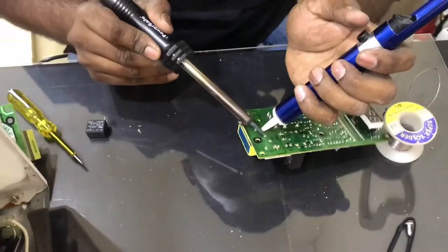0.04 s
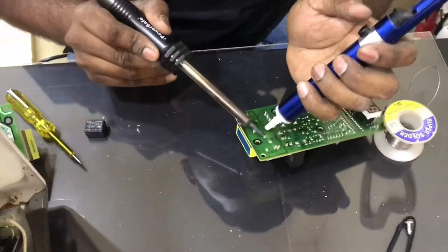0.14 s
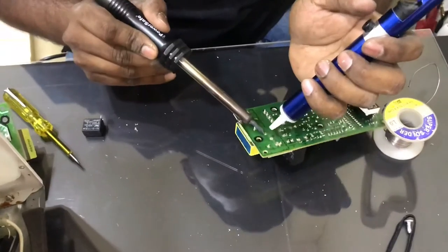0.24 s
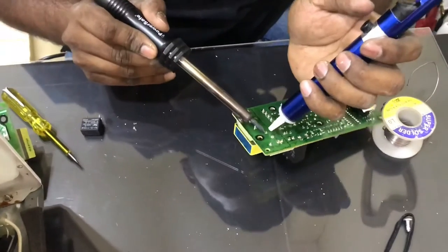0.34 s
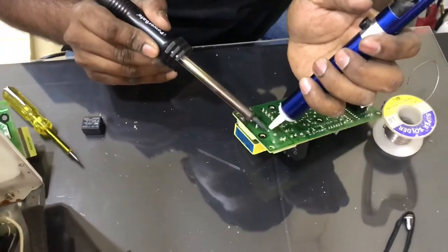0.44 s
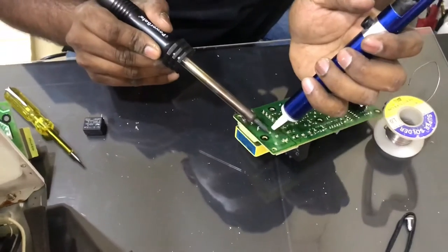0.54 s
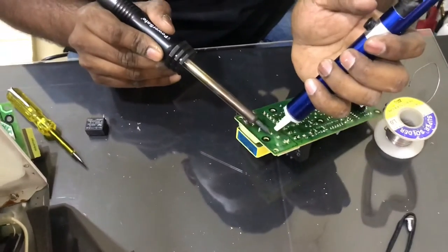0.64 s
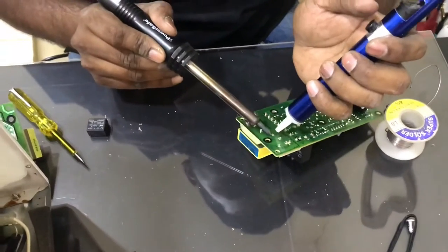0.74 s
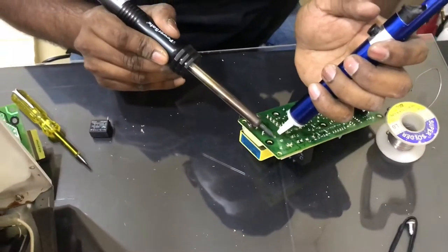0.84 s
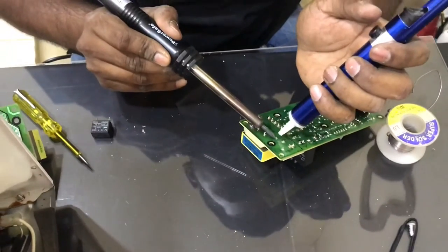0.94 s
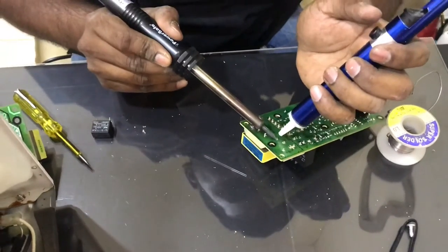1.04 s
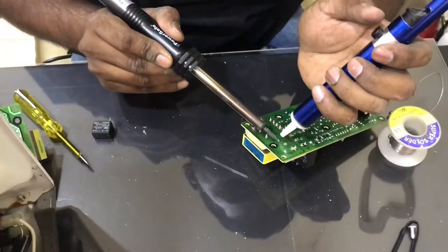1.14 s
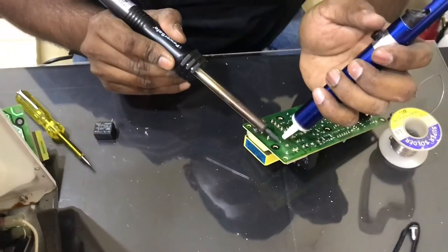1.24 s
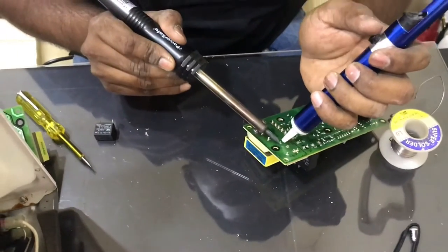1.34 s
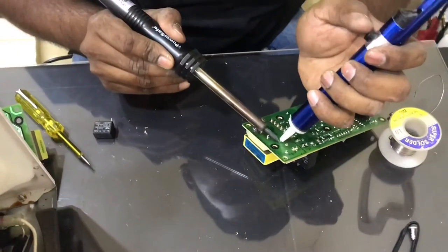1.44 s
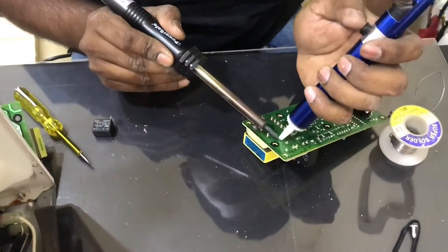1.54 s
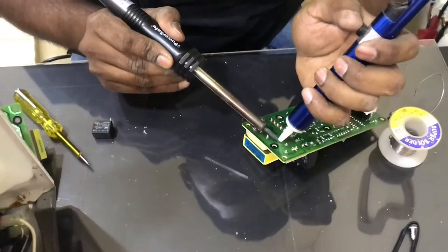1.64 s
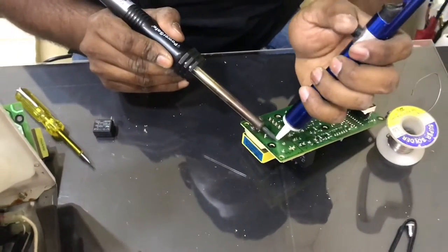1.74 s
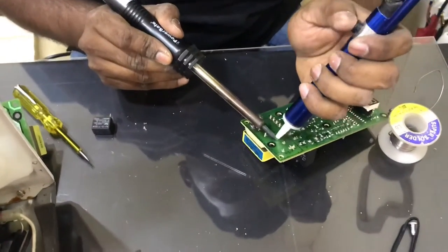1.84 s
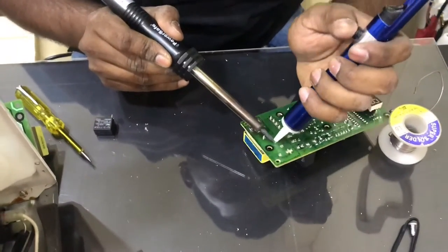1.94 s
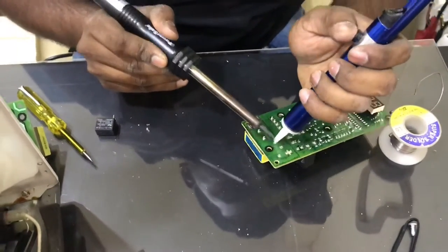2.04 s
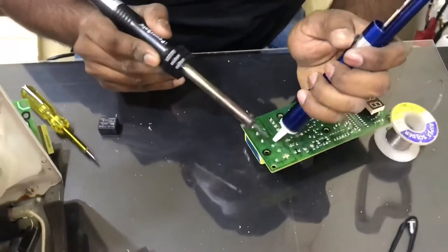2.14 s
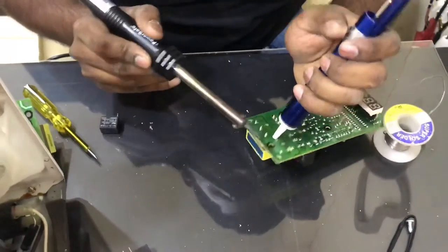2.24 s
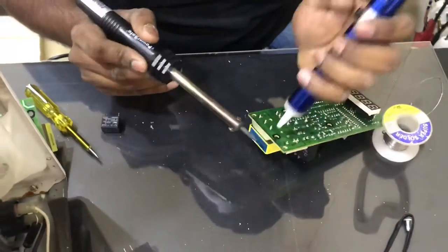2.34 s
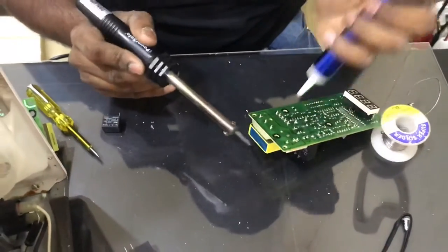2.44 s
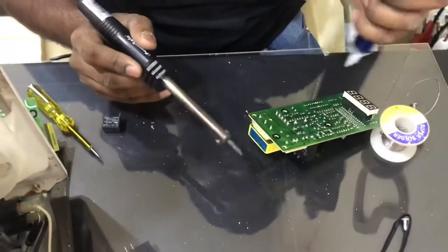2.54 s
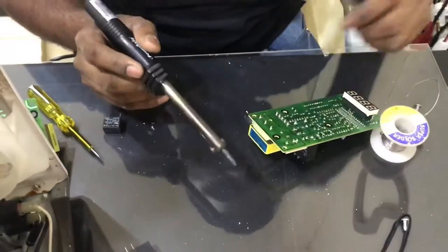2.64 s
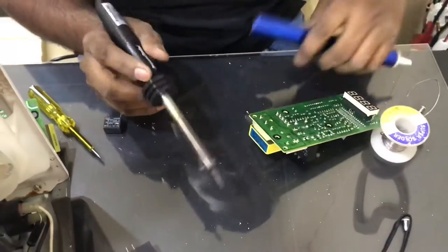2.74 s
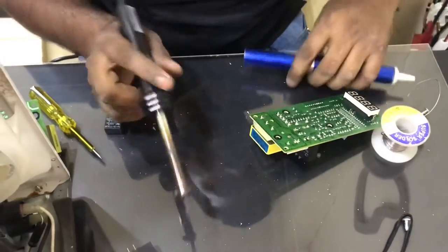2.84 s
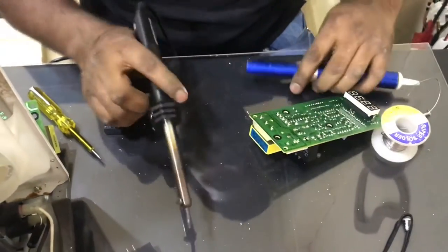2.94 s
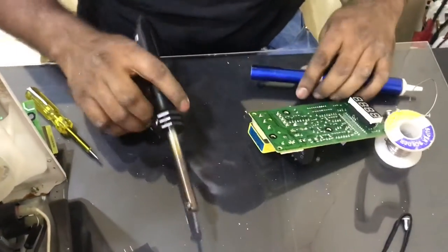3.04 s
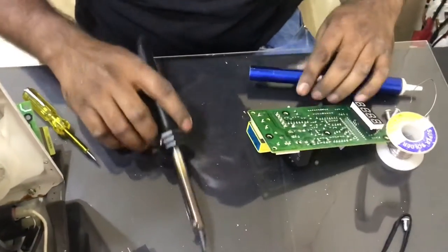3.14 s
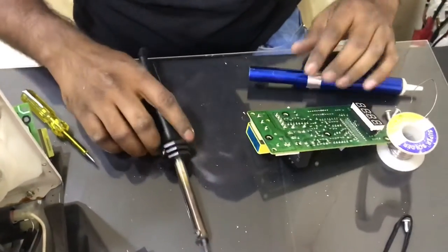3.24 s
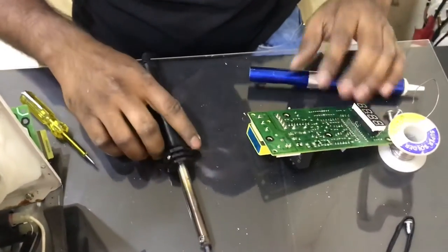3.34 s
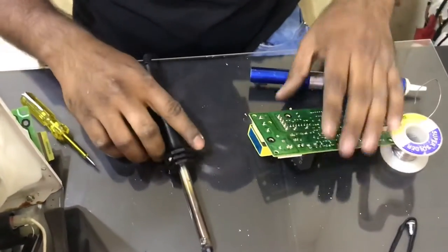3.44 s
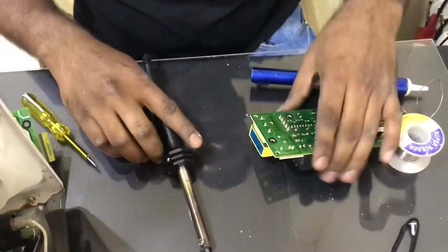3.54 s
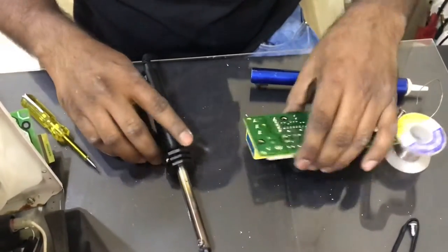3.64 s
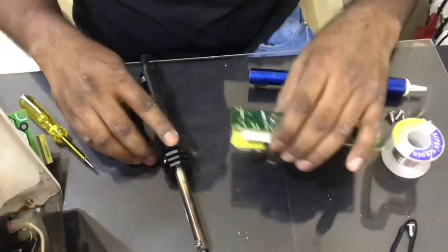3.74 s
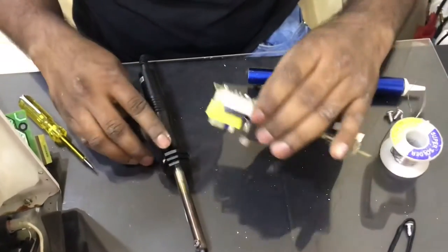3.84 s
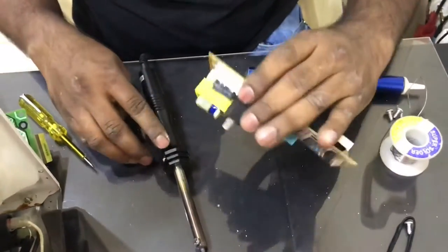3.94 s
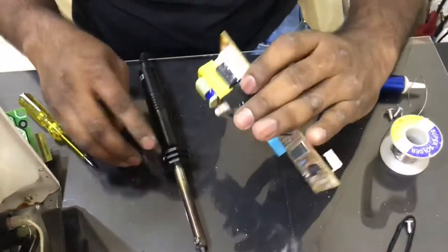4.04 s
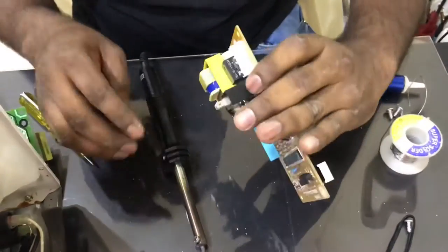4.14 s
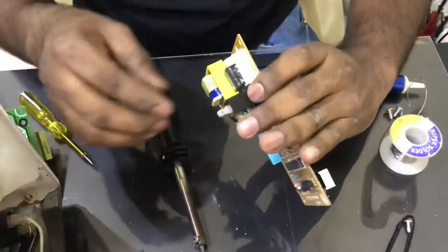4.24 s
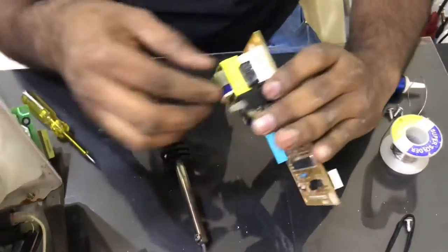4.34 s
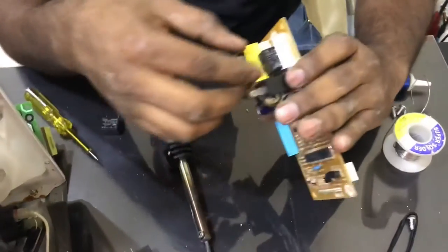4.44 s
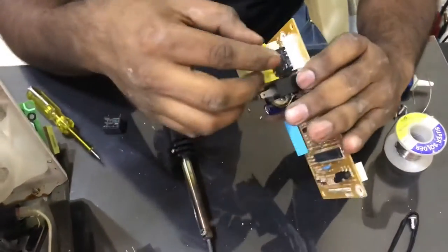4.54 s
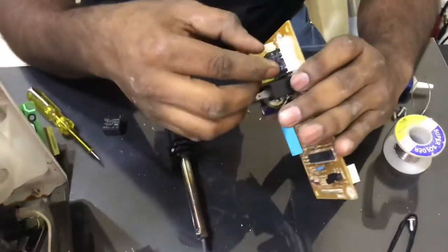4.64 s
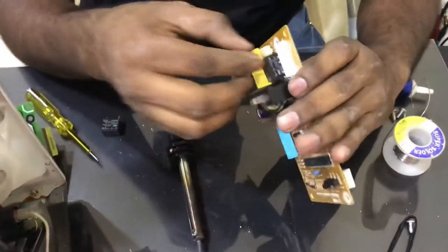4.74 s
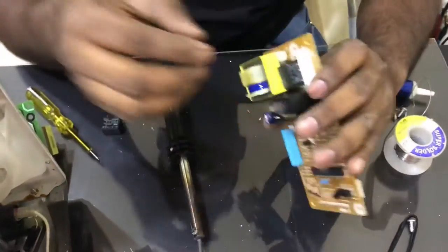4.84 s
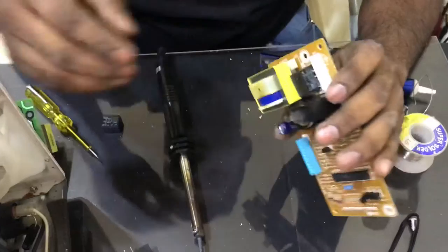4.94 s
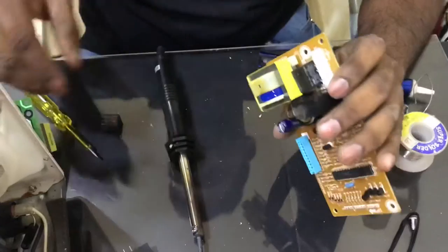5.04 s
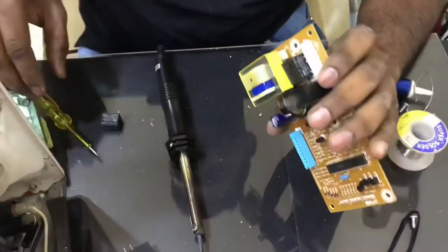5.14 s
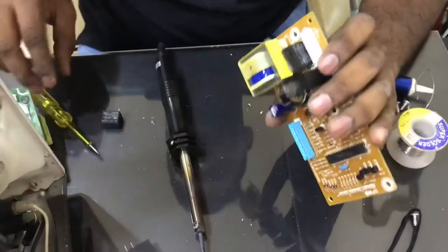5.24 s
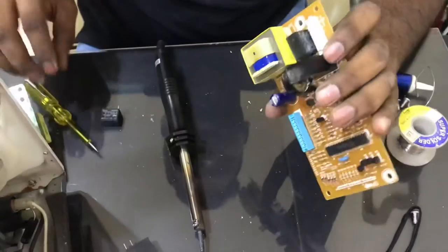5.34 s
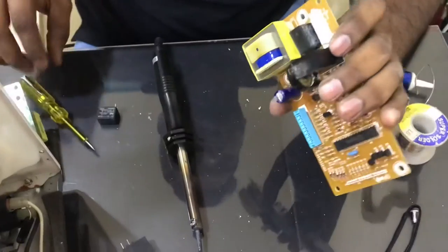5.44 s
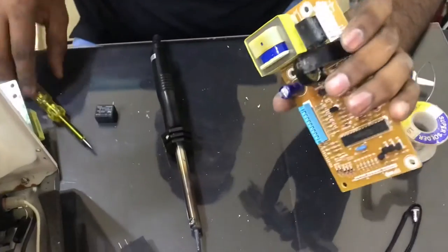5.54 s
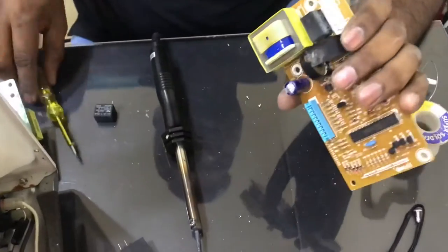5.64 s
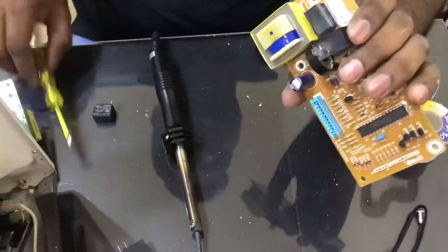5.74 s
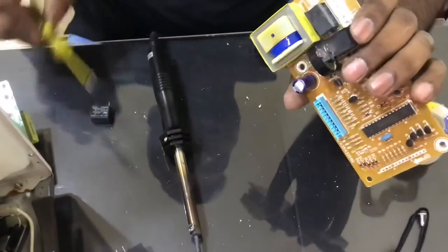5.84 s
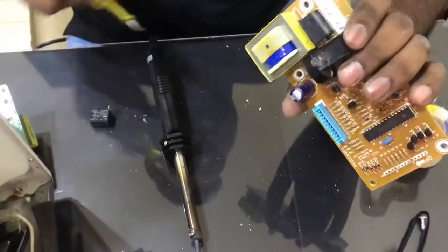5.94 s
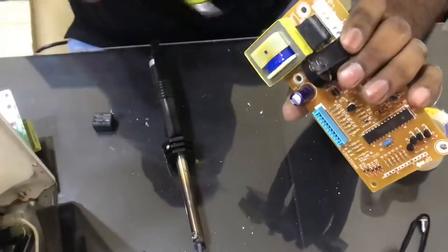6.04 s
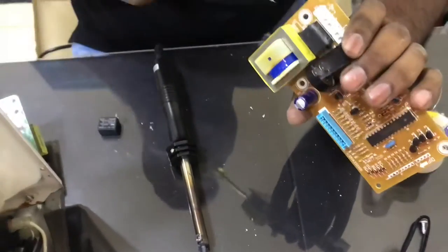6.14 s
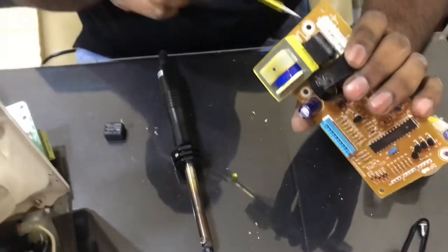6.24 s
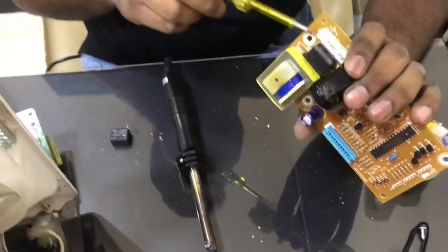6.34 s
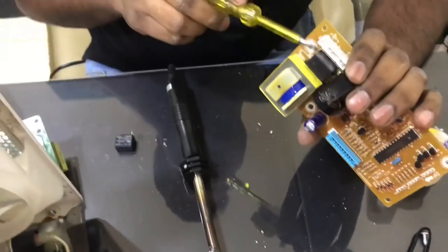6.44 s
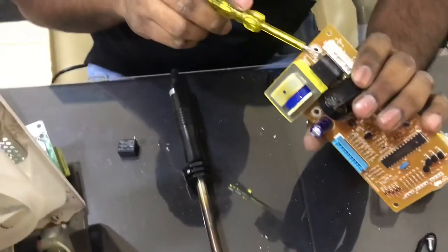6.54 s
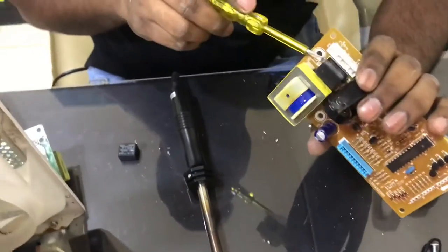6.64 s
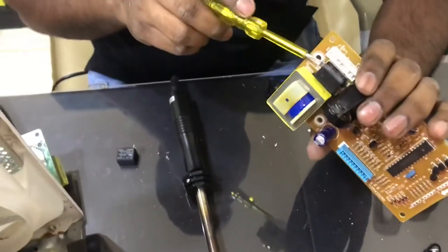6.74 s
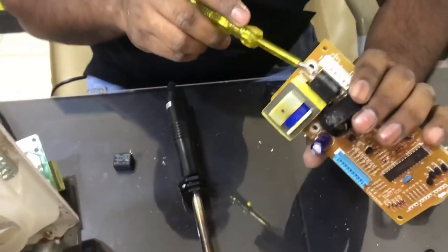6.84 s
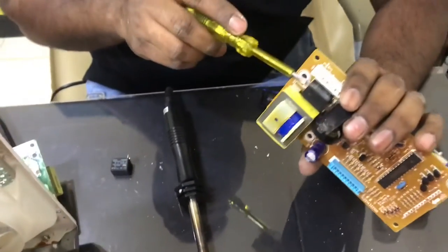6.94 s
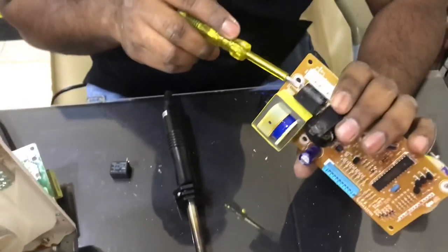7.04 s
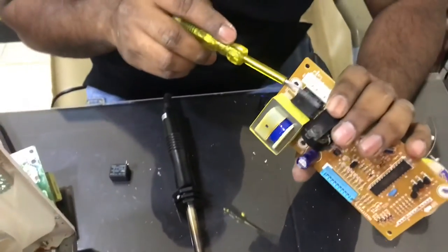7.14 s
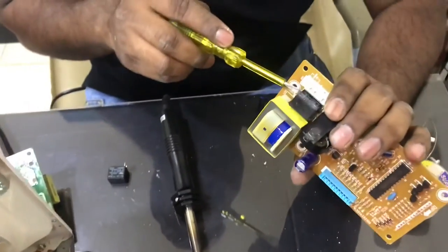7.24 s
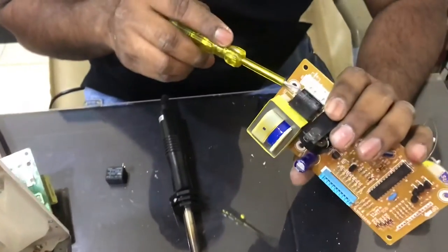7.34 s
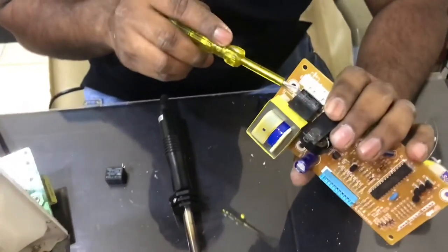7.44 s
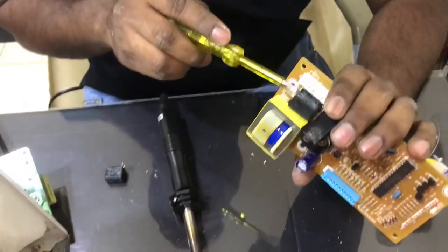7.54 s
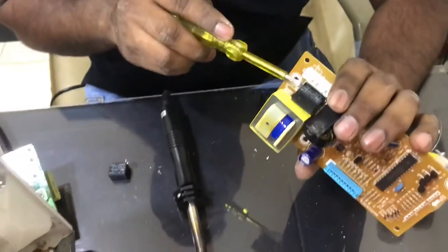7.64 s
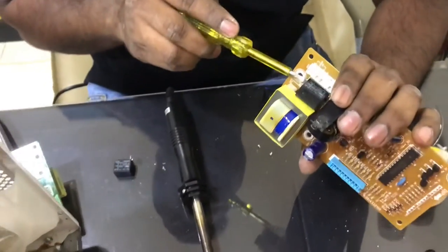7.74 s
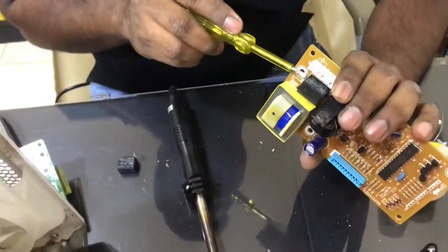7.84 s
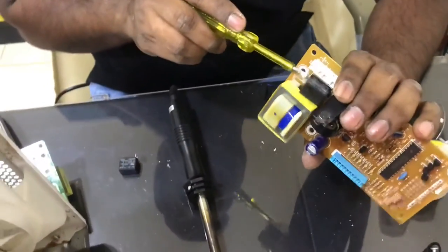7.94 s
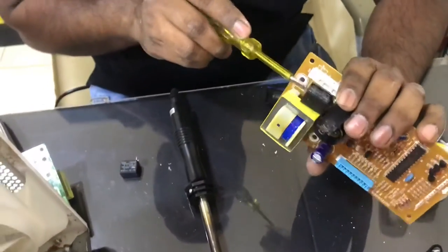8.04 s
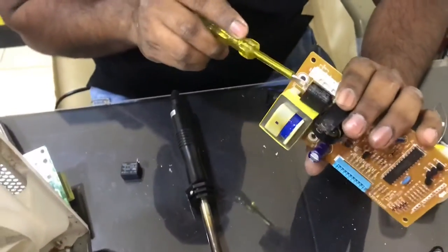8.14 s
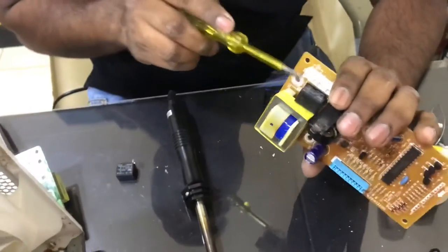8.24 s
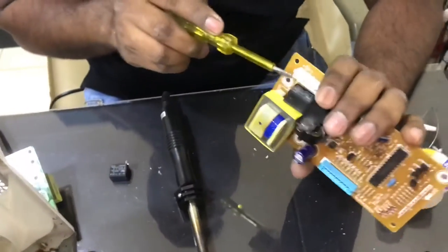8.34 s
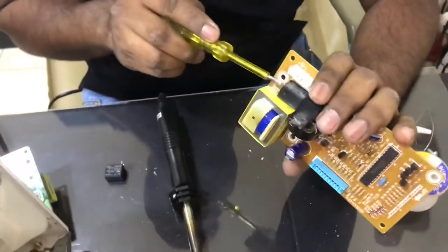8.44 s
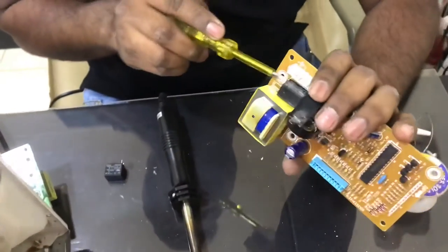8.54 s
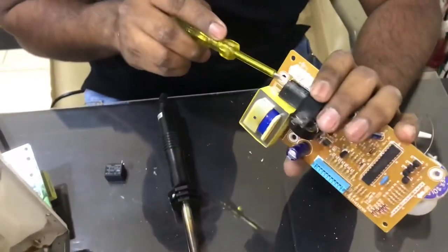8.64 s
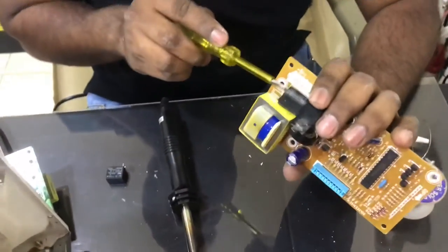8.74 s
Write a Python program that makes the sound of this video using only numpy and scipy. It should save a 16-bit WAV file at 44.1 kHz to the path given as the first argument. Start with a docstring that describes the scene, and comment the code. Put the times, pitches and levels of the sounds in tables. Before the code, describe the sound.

Small ticks on a circuit board, a sharp plunger snap, a tool laid down hard, a dropped part's knocks, then squeaky screwdriver taps.

```python
"""A small room with a low hum, heard from a bench where a circuit board is being repaired. Tips tick and tools rub
on the board; a spring-loaded desoldering pump fires, its nozzle skids off, the board clacks and the pump is laid down.
The board is turned over, a part snaps off and knocks down to one side, and a screwdriver picks at the board,
squeaking once as a thin hiss sets in. Each blow is a crack and a rattle of noise through an object's resonances,
with the room's answer and often the bench top's boom; rubbing, air and hiss are coloured noise, the hum is sines."""
import sys
import numpy as np
from scipy import signal
from scipy.fft import rfft, irfft
from scipy.io import wavfile
from scipy.ndimage import map_coordinates

SR = 44100
rng = np.random.default_rng(int(sys.argv[2]) if len(sys.argv) > 2 else 0)


def master_out(mix):
    """Clip the mix to full scale and print it as 16-bit PCM to the path in sys.argv[1]."""
    frames = np.transpose(np.atleast_2d(mix))
    ceiling = np.clip(frames, -1, 1)
    pcm = np.round(ceiling * 32767).astype(np.int16)
    wavfile.write(sys.argv[1], SR, pcm)


N = 387198  # samples


def amp(db):
    """Decibels to gain."""
    return 10 ** (np.asarray(db) / 20)


def unit(x):
    """Scale to rms 1."""
    return x / np.sqrt(np.mean(x ** 2) + 1e-20)


def along(points, hz):
    """Read a curve of (Hz, value) points on a log frequency axis."""
    f, v = np.transpose(points)
    return np.interp(np.log(hz + 1), np.log(f + 1), v)


def wobble(rate):
    """A smooth random curve with rate knots a second."""
    knots = rng.standard_normal(int(N * rate / SR) + 4)
    return map_coordinates(knots, [np.arange(N) * rate / SR])


def noise(colour):
    """Steady noise of rms 1 with the given colour."""
    hz = np.fft.rfftfreq(N, 1 / SR)
    white = rng.standard_normal(N)
    return unit(irfft(rfft(white) * amp(along(colour, hz)), N))


def causal(gain):
    """The minimum-phase response with this gain: the energy comes as early as it can."""
    cepstrum = irfft(np.log(np.maximum(gain, 1e-6)))
    half = len(cepstrum) // 2
    cepstrum[1:half] *= 2
    cepstrum[half + 1:] = 0
    return np.exp(rfft(cepstrum))


def at(s, x):
    """A silent track that holds x from time s, in seconds."""
    track = np.zeros(N)
    part = track[round(s * SR):][:len(x)]
    part += x[:len(part)]
    return track


# How long the small room rings. Each row: frequency in Hz, time to fall 60 dB in seconds.
ROOM_DECAY = [(100, .46), (260, 0.34), (700, 0.39), (1840, 0.33), (4850, 0.34), (12800, 0.17)]


def room(x, gap_s=0.0055):
    """The walls' answer to one blow: it builds up over a short gap, then each frequency dies at its own speed."""
    hz, t, grains = signal.stft(rng.standard_normal(len(x)), SR, nperseg=256)
    fade = amp(-60 * t / along(ROOM_DECAY, hz)[:, None])
    tail = signal.istft(grains * fade, SR, nperseg=256)[1][:len(x)]
    tail = tail * (1 - np.exp(-(np.arange(len(tail)) / SR / gap_s) ** 2))
    return signal.fftconvolve(x, tail / np.linalg.norm(tail))[:len(x)]


# Low resonances of the bench top, before each blow's boom level and a slight random detuning.
# Each row: frequency in Hz, relative level in dB, time to fall 60 dB in seconds.
BENCH_MODES = [(82, -4, 0.32), (112.6, 0, 0.37), (195.9, -17, 0.33), (337.8, -15.5, 0.24),
               (408, -22.5, 0.17)]


def bench(t, swell_s=0.011):
    """The bench top takes a few cycles to swing up, then booms as decaying sines."""
    ring = 0
    for hz, db, t60 in BENCH_MODES:
        detuned_hz = hz * (1 + rng.normal(0, 0.01))
        ring = ring + amp(db - 60 * t / t60) * np.sin(2 * np.pi * detuned_hz * t)
    return ring * (1 - np.exp(-t / swell_s))


def blow(s, db, colour, modes, knock_db, edge_db, boom_db, room_db, rattle_t60, ring_db, crack):
    """One contact: a crack and a brief rattle ring the object, the bench and the room."""
    t, hz = np.arange(SR) / SR, np.fft.rfftfreq(SR, 1 / SR)
    force = rng.standard_normal(SR) * amp(-60 * t / rattle_t60)
    force /= np.linalg.norm(force)
    force[0] += crack
    peaks = sum(amp(g + ring_db) ** 2 / (1 + (2 * (hz - f) / width) ** 2) for f, width, g in modes)
    # a crowd of minor modes, about one every 60 Hz, is struck at new strengths each time
    minor_db = 2.8 * map_coordinates(rng.standard_normal(len(hz) // 60 + 4), [hz / 60])
    body = np.sqrt(amp(along(colour, hz) + minor_db) ** 2 + peaks)
    # where and how hard the object is hit sets its knock (low band) and edge (high band) against the middle
    bands = ((250, 1400), (1500, 6500), (7000, 15500))
    low, mid, high = [np.linalg.norm(body[(hz > a) & (hz < b)]) for a, b in bands]
    low_gain_db = knock_db + 20 * np.log10(mid / low)
    high_gain_db = edge_db + 20 * np.log10(mid / high)
    balance = [(1250, low_gain_db), (1900, 0), (4400, 0), (6800, high_gain_db)]
    # the level is that of the middle band's energy gathered into one millisecond
    size = amp(db) * SR * np.sqrt(.001 / 2) / mid
    response = size * causal(body * amp(along(balance, hz)))
    ring = irfft(response)
    direct = irfft(response * rfft(force))
    direct *= np.linalg.norm(ring) / np.linalg.norm(direct)
    # the walls gather sound from all sides of the object, so their answer is smoother than the direct crack
    return at(s, direct + amp(room_db) * room(ring) + amp(boom_db) * bench(t))


# The room's low hum, before the common hum level and the waver. Each row: frequency in Hz, level in dB.
HUM_TONES = [(48.5, -64.5), (64.6, -56), (97, -55), (114, -58.5), (145.5, -53.5), (194, -68),
             (291.5, -66.5), (339, -74), (437, -76)]
# Rumble of moving air. Each row: frequency in Hz, relative level in dB.
AIR_COLOUR = [(20, -23.5), (35, -11.5), (55, 1), (110, -3), (160, -3), (200, -8), (300, -12.5),
              (450, -17.5), (1000, -21), (3000, -30.5), (5500, -36), (10000, -41.5), (16000, -39.5)]


def background(air_db=-54, hum_db=-2.5, waver_db=2.1, drift_rad=0.57):
    """The room tone: sines wavering in level and phase over the noise of moving air."""
    t = np.arange(N) / SR
    hum = 0
    for hz, db in HUM_TONES:
        level = amp(db + waver_db * wobble(6))
        phase = 2 * np.pi * (hz * t + rng.random()) + drift_rad * wobble(6.1)
        hum = hum + level * np.sin(phase)
    air = amp(air_db + 0.55 * wobble(2.7)) * noise(AIR_COLOUR)
    return amp(hum_db) * np.sqrt(2) * hum + air


# Broad colour of the circuit board. Each row: frequency in Hz, relative level in dB.
BOARD_COLOUR = [(120, -49), (200, -7), (400, -8.5), (933, -17.5), (1120, -19), (1740, -13.5), (2200, -4.5),
                (2960, -16.5), (3400, -9.5), (5230, -17.5), (6400, -15.5), (7410, -27), (9750, -14),
                (10500, -35.5), (12600, -11), (16000, -22.5)]
# Board resonances, before the ring level. Each row: frequency in Hz, width in Hz, level in dB.
BOARD_RESONANCES = [(2080, 110, 0), (2420, 24, -4.5), (3634, 100, -7.5), (4400, 140, -8.5),
                    (6400, 380, -11), (11460, 500, -12), (13890, 500, -13.5)]
FIRM_DB = -29.5  # a tick this strong presses the board onto the bench
EDGE_SLOPE, BOOM_SLOPE = 0.42, 2.23  # dB of edge and of boom lost per dB that a tick is lighter


def tick(s, db, edge_db=2, boom_db=-3):
    """A tip touches the board: the lighter the touch, the duller it is and the less it reaches the bench."""
    light_db = max(FIRM_DB - db, 0)
    return blow(s, db, BOARD_COLOUR, BOARD_RESONANCES, knock_db=-8, edge_db=edge_db - EDGE_SLOPE * light_db,
                boom_db=db + boom_db - BOOM_SLOPE * light_db, room_db=-14.5, rattle_t60=0.023,
                ring_db=-1.5, crack=0.5)


# Nozzle and iron tick on the board. Each row: start in seconds, level in dB.
CLEAR_TICKS = [(0.4462, -35.5), (0.4802, -46.5), (.845, -45), (1.452, -43), (1.5397, -45), (2.2954, -34),
               (2.304, -35.5), (2.3154, -21), (2.3675, -29), (2.3954, -33), (2.5316, -47), (2.861, -42.5),
               (4.594, -44.5)]


def tips(count=14, faint_db=-60, spread_db=2):
    """Clear ticks, and tiny bright ones while the nozzle is held on the joint and the board is turned over."""
    share = (np.arange(count) + rng.random(count)) / count
    when = np.interp(share, [0, .7, .701, 1], [.2, 2.08, 3.85, 4.7])  # two spans, in seconds
    faint = sum(blow(s, faint_db + spread_db * rng.standard_normal(), BOARD_COLOUR, BOARD_RESONANCES,
                     knock_db=-8, edge_db=0.5, boom_db=-np.inf, room_db=-10.5, rattle_t60=0.017,
                     ring_db=-2, crack=.5) for s in when)
    return faint + sum(tick(s, db) for s, db in CLEAR_TICKS)


# Strokes on the board. Each row: start in seconds, length in seconds, level in dB, what rubs.
STROKES = [(0.648, 0.12, -69, "finger"), (1.064, 0.064, -50, "palm"), (1.174, 0.16, -52.5, "nozzle"),
           (1.646, .13, -50, "palm"), (2.3, 0.15, -50.5, "nozzle"), (2.813, 0.23, -61, "finger"),
           (4.338, 0.15, -63, "finger"), (6.03, .55, -68, "finger"), (7.36, 0.25, -55, "blade"),
           (7.668, 0.28, -60, "finger"), (8.112, .16, -65.5, "finger"), (8.42, 0.32, -67.5, "finger")]
# Colours of the rubbing: the board shuddering, nozzle on solder, blade on the part, skin sliding.
# Each row: frequency in Hz, relative level in dB.
DRAG_COLOUR = [(130, -17), (210, 11.5), (270, 3), (320, 7.5), (380, -16), (600, -25), (1500, -38)]
SCRAPE_COLOUR = [(1000, -16), (1500, 1), (2100, -5), (2850, 4.5), (3600, -7.5), (4270, -4.5), (5000, -13.5),
                 (6500, -22)]
GRATE_COLOUR = [(200, -19), (410, 10.5), (560, -17), (880, -1.5), (1200, -5), (2100, -11.5), (2750, -15),
                (3400, -21), (6000, -34)]
SKIN_COLOUR = [(2000, -33), (3500, 4.5), (5000, -2.5), (7000, -1), (10000, -4.5), (13000, -2), (16000, -6)]
BITE_SHARE, HOLD_SHARE = 0.14, 0.52  # shares of a stroke at which the pressure is full and starts to ease


def rubbing(rough_db=4.5):
    """Tools and fingers catch and slip on the board; each stroke bites quickly and eases off."""
    t = np.arange(N) / SR
    slips = unit(amp(rough_db * wobble(110)))
    drag = noise(DRAG_COLOUR)
    scrape = noise(SCRAPE_COLOUR) * slips
    grate = noise(GRATE_COLOUR) * slips
    skin = noise(SKIN_COLOUR) * np.sqrt(slips)
    texture = {"finger": skin + amp(-6.5) * scrape,
               "palm": drag + amp(-11.5) * scrape + amp(-18) * skin,
               "nozzle": scrape + amp(-6.0) * drag + amp(-7.0) * skin,
               "blade": grate + amp(-4.0) * drag + amp(-7.0) * skin}
    strokes = np.zeros(N)
    for s, length, db, what in STROKES:
        pressure = np.interp((t - s) / length, [0, BITE_SHARE, HOLD_SHARE, 1], [0, 1, 1, 0])
        strokes += amp(db) * pressure * texture[what]
    return strokes


ROOM_PER_KNOCK = 0.2  # dB per dB: a blow that shakes the whole pump feeds the room more
# The plunger's release, end stop and rebound.
# Each row: start in seconds, level in dB, knock in dB and edge in dB against the middle band.
PLUNGER_JOLTS = [(2.0959, -12.5, -4, 2.5), (2.1239, -11.5, -16.5, -5.5), (2.1557, -23, -9, -8.5)]
# Broad colour of the pump. Each row: frequency in Hz, relative level in dB.
PUMP_COLOUR = [(120, -34), (200, -0.5), (722, -11.5), (1270, -8), (1530, -16.5), (2130, -4.5), (3250, -4),
               (3970, -4), (6050, -9), (6520, -13.5), (7540, -13), (10900, -8), (16000, -14.5)]
# Pump resonances, before the ring level. Each row: frequency in Hz, width in Hz, level in dB.
PUMP_RESONANCES = [(2753, 160, 1), (4050, 600, 1), (6600, 400, -3.5), (9060, 400, -3)]


def pump_snap(room_db=-8.0):
    """The plunger is released, slams into its stop and rebounds; each jolt reaches the bench."""
    return sum(blow(s, db, PUMP_COLOUR, PUMP_RESONANCES, knock, edge, boom_db=-27,
                    room_db=room_db + ROOM_PER_KNOCK * knock, rattle_t60=.022, ring_db=-1.5, crack=.22)
               for s, db, knock, edge in PLUNGER_JOLTS)


# The board clacks against the bench as it rocks and as it is lifted.
# Each row: start in seconds, level in dB, knock in dB and edge in dB against the middle band.
BOARD_CLACKS = [(2.333, -36, 9, -5), (3.610, -46, -2, -16), (3.6568, -22, -14, -5), (3.688, -39, -15, -18),
                (3.7239, -31, -8, 2.5), (3.7285, -31.5, 2, 6.5)]
# More resonances, with the board clear of the bench. Each row: frequency in Hz, width in Hz, level in dB.
FREE_RESONANCES = [(2380, 50, 3), (4270, 120, -8)]


def board_lift(boom_db=-12):
    """Held loosely, the board rings more freely; the duller a clack, the more the bench booms."""
    return sum(blow(s, db, BOARD_COLOUR, BOARD_RESONANCES + FREE_RESONANCES, knock, edge,
                    boom_db=db + knock + boom_db, room_db=-9.5, rattle_t60=0.025, ring_db=0, crack=0.46)
               for s, db, knock, edge in BOARD_CLACKS)


# The barrel is laid down and settles.
# Each row: start in seconds, level in dB, knock in dB and edge in dB against the middle band.
BARREL_BLOWS = [(2.9792, -11, -22, -14), (2.9983, -21.5, -6, -5), (3.0274, -13.5, 2.5, -7.5),
                (3.138, -35.5, -2, -4.5), (3.297, -28.5, 2, -9)]
# Broad colour of the barrel. Each row: frequency in Hz, relative level in dB.
BARREL_COLOUR = [(120, -45.5), (200, -7), (500, -15.5), (700, -21), (1080, -8.5), (1350, -11), (1900, -19),
                 (2600, -21), (4050, -14), (4860, -21.5), (5730, -21), (9230, -25.5), (12400, -23.5),
                 (16000, -29.5)]
# Barrel resonances, before the ring level. Each row: frequency in Hz, width in Hz, level in dB.
BARREL_RESONANCES = [(719, 34, 4.5), (970, 30, -1), (1113, 90, 5), (2700, 340, -5.5), (3250, 240, -9.5),
                     (3940, 220, -4)]
# The bench top's short woody ring. Each row: frequency in Hz, relative level in dB.
WOOD_COLOUR = [(350, -26.5), (650, -4.5), (950, 2), (1200, -4), (1550, -19.5), (4000, -47)]


def pump_down(room_db=-11.0, boom_db=-17, wood_db=-20, wood_t60=.26):
    """The barrel clatters down; the more knock in a blow, the more the bench booms and its wood rings."""
    t = np.arange(N) / SR
    clatter = np.zeros(N)
    for s, db, knock, edge in BARREL_BLOWS:
        clatter += blow(s, db, BARREL_COLOUR, BARREL_RESONANCES, knock, edge, boom_db=db + knock + boom_db,
                        room_db=room_db + ROOM_PER_KNOCK * knock, rattle_t60=0.024, ring_db=-2.0, crack=0.76)
        wood = noise(WOOD_COLOUR) * amp(-60 * t / wood_t60)
        clatter += at(s, amp(db + knock + wood_db) * wood)
    return clatter


PART_SNAP_S, PART_SNAP_DB = 4.782, -14.5  # the part breaks free
# It grazes, lands, tumbles and lands again. Each row: start in seconds, level in dB, knock in dB and edge in dB
# against the middle band, bench boom in dB, rattle's time to fall 60 dB in seconds, room level in dB.
PART_LANDINGS = [(5.0955, -48.5, 1, -10, -56, .05, 5.5), (5.1209, -16.5, 1.5, -8.5, -22, 0.052, -2.5),
                 (5.1459, -19.5, -1.5, -5, -52, 0.034, -8.5), (5.3502, -18, -0.5, -19.5, -36.5, 0.084, -4)]
# Broad colours of the snap and of the landings. Each row: frequency in Hz, relative level in dB.
PART_COLOUR = [(120, -47), (200, -3.5), (548, -29), (735, -13), (1160, -6.5), (1950, -5.5), (2500, 3),
               (3100, 5.5), (4500, -2.5), (5200, -17.5), (7000, -21), (14900, -19.5), (16000, -27.5)]
LANDING_COLOUR = [(120, -21), (200, 6.5), (260, -22), (347, 3), (420, -27), (538, -3.5), (806, -1),
                  (1100, 5.5), (1900, -14), (2700, -12.5), (4120, -15), (5200, -21), (10100, -22.5),
                  (16000, -29)]
# Resonances of both, before the ring level. Each row: frequency in Hz, width in Hz, level in dB.
PART_RESONANCES = [(687, 48, 0.5), (1940, 300, -4), (2480, 210, 2), (3150, 400, 6), (3700, 300, 4),
                   (4580, 180, 6.5)]
LANDING_RESONANCES = [(338, 49, 11.5), (412, 29, 3.5), (1088, 98, 0), (1220, 77, -6), (1450, 120, -0.5),
                      (1865, 80, -7.5), (2300, 42, -9)]


def loose_part():
    """A part snaps off the board and knocks down nearby, ringing other resonances where it lands."""
    snap = blow(PART_SNAP_S, PART_SNAP_DB, PART_COLOUR, PART_RESONANCES, knock_db=-5.5, edge_db=-4,
                boom_db=-29, room_db=-11.0, rattle_t60=0.029, ring_db=-1.5, crack=0.26)
    landings = sum(blow(s, db, LANDING_COLOUR, LANDING_RESONANCES, knock, edge, boom, room_db, t60,
                        ring_db=-1.0, crack=0.12)
                   for s, db, knock, edge, boom, t60, room_db in PART_LANDINGS)
    return snap + landings


# Screwdriver taps. Each row: start in seconds, level in dB, knock in dB and edge in dB against the middle band,
# ring level in dB, ringing pitches in Hz.
BLADE_TAPS = [(6.3901, -34.5, -9.5, -7.5, 7.5, (1126, 2140, 4500, 5330)),
              (7.603, -23.5, -14, -3.5, 12, (4610, 5040, 7050, 13400)),
              (7.961, -25, -14, -11, 12.5, (4120, 3930)),
              (8.1827, -38, -10.5, -10.5, 10, (4250, 3400, 2100, 1120)),
              (8.5604, -34, -15.5, -9, 6, (4300, 2150, 5800))]
# Broad colour of the screwdriver. Each row: frequency in Hz, relative level in dB.
DRIVER_COLOUR = [(180, -29), (400, -4), (1200, -2.5), (2600, -7.5), (3700, 0), (5000, -31), (6500, -43),
                 (8500, -11.5), (11000, -25), (13200, -14), (16000, -22)]
# Its lasting resonances, before the ring level. Each row: frequency in Hz, width in Hz, level in dB.
DRIVER_RESONANCES = [(1710, 190, -10.5), (6380, 570, -16)]


def screwdriver(width=0.039):
    """Blade and board ring at different pitches with every grip; held clear, the board does not boom the bench."""
    taps = np.zeros(N)
    for s, db, knock, edge, ring_db, pitches in BLADE_TAPS:
        grip = [(hz, width * hz, 0) for hz in pitches]
        taps += blow(s, db, DRIVER_COLOUR, DRIVER_RESONANCES + grip, knock, edge, boom_db=-np.inf,
                     room_db=-10.5, rattle_t60=0.027, ring_db=ring_db, crack=0.44)
    return taps


SQUEAK_S, SQUEAK_LENGTH_S = 7.368, .065  # the blade's first bite
# Partials of the squeak. Each row: frequency in Hz before the waver, level in dB at the top of the swell.
SQUEAK_TONES = [(861, -52.5), (2480, -58), (2930, -60)]


def squeak(waver=0.023):
    """The blade squeaks briefly as it first bites: unsteady sines under one swell."""
    t = np.arange(N) / SR
    swell = np.sin(np.pi * np.clip((t - SQUEAK_S) / SQUEAK_LENGTH_S, 0, 1))
    tones = 0
    for hz, db in SQUEAK_TONES:
        warped_s = np.cumsum(1 + waver * wobble(200)) / SR
        tones = tones + amp(db) * np.sin(2 * np.pi * hz * warped_s)
    return swell * tones


HISS_START_S, HISS_RISE_S, HISS_DB = 7.55, 0.11, -69.5
# Colour of the thin hiss. Each row: frequency in Hz, relative level in dB.
HISS_COLOUR = [(1500, -14), (4900, -14), (5600, 5.5), (6400, -0.5), (7300, -7), (15000, -11)]


def hiss(flutter_db=1.1):
    """A thin hiss of coloured noise fades in and stays, fluttering slightly."""
    rise = np.clip((np.arange(N) / SR - HISS_START_S) / HISS_RISE_S, 0, 1)
    return rise * amp(HISS_DB + flutter_db * wobble(30)) * noise(HISS_COLOUR)


def scene():
    """Everything at the bench, in one channel."""
    mix = background() + tips() + rubbing() + pump_snap() + board_lift() + pump_down()
    mix = mix + loose_part() + screwdriver() + squeak() + hiss()
    return mix[None]


TOP_HZ = 16000


def record(dry):
    """One microphone channel, falling off steeply at the recorder's band limit."""
    hz = np.fft.rfftfreq(N, 1 / SR)
    return irfft(rfft(dry) / np.sqrt(1 + (hz / TOP_HZ) ** 160), N)


dry = scene()
out = record(dry)
master_out(out)
```